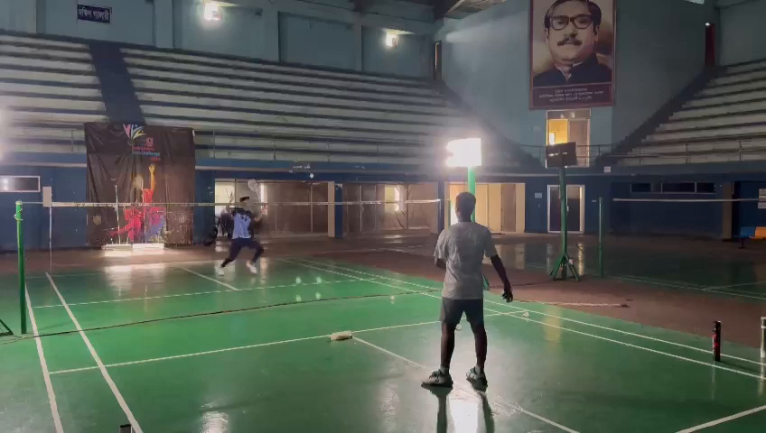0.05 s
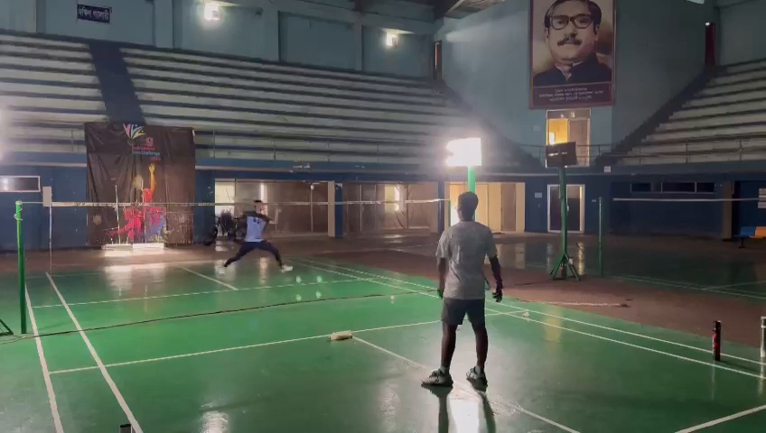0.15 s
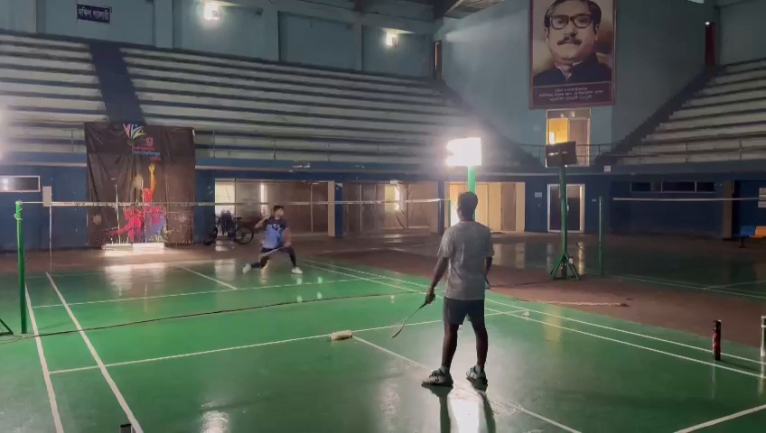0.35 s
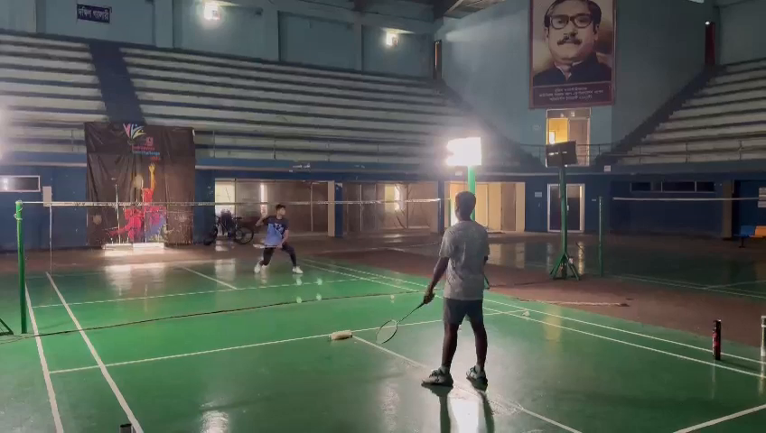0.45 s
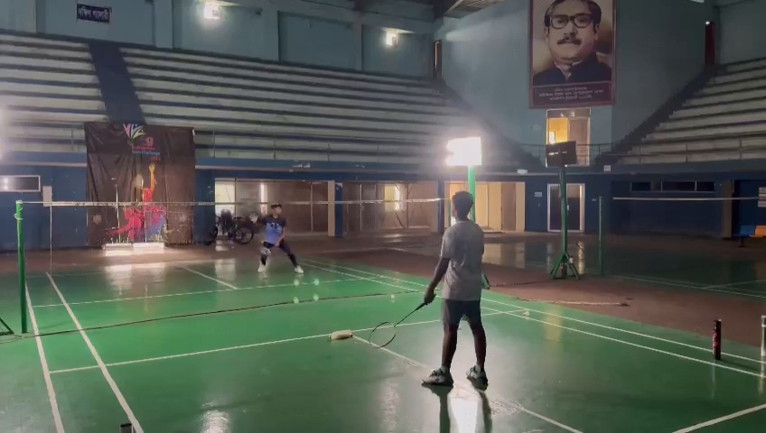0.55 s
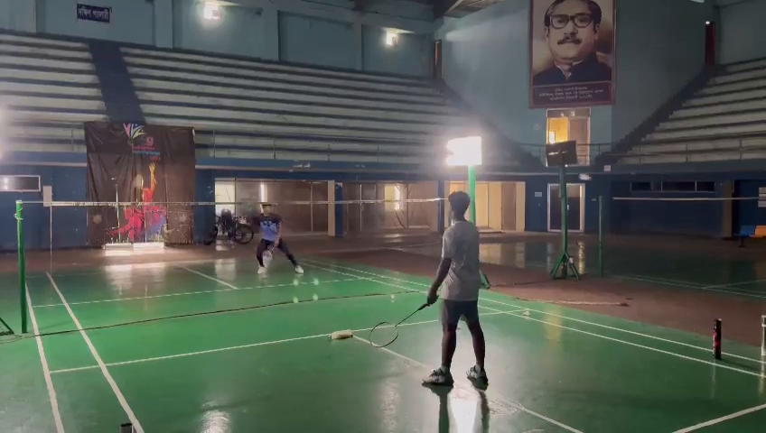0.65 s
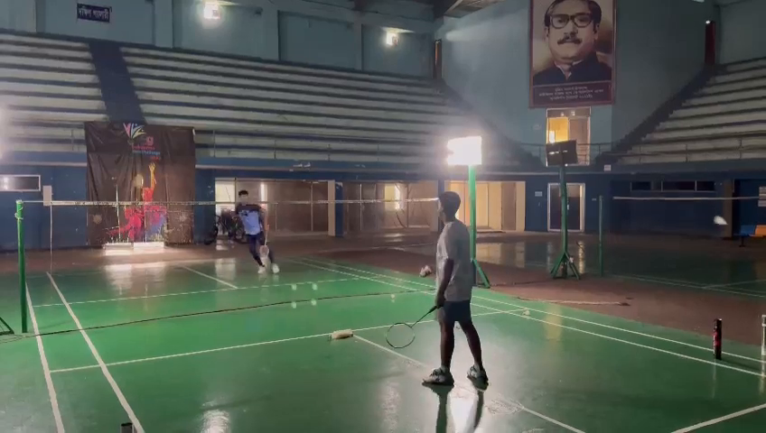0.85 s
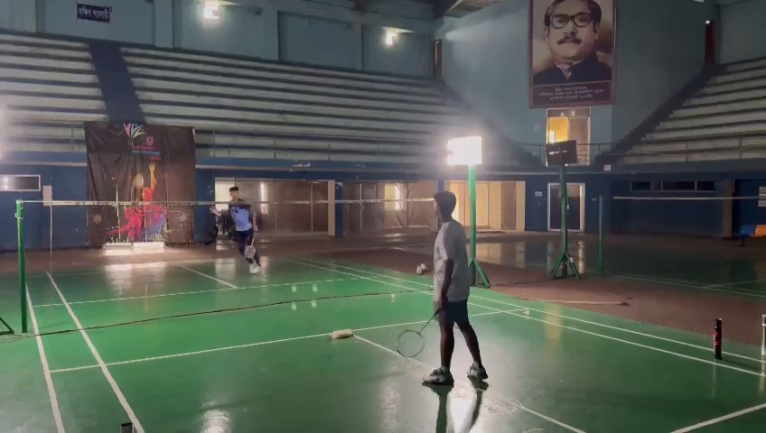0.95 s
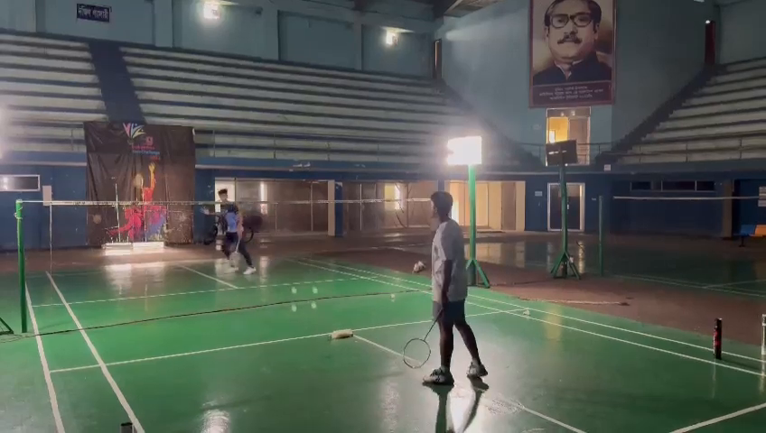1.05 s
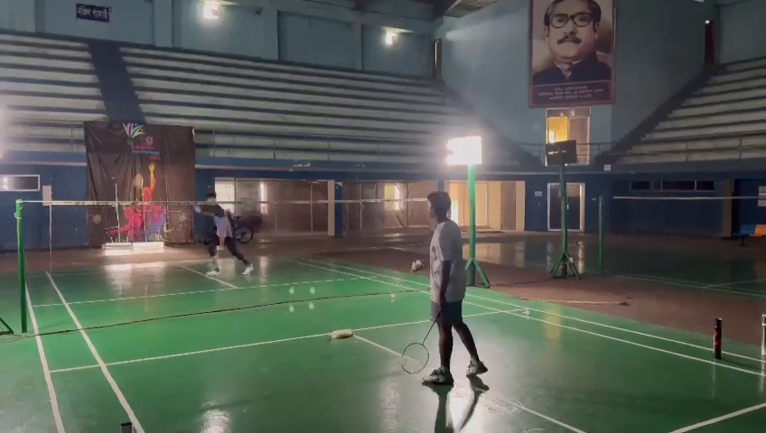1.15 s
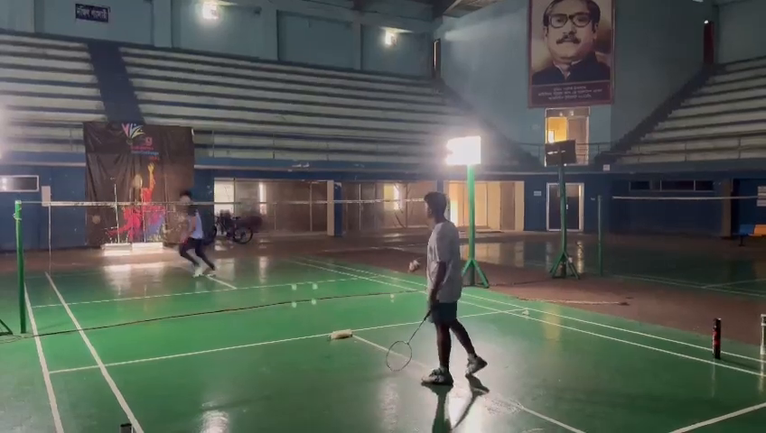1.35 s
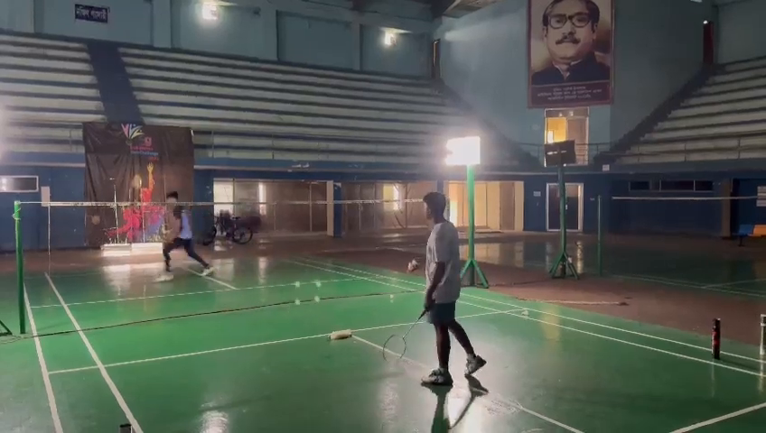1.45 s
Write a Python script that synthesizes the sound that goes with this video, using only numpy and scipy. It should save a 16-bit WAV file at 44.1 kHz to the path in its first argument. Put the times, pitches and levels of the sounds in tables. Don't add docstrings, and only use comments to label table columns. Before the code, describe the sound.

A racket smacks a shuttlecock with a bright, stringy crack; brief shoe squeaks and a foot stamp come just before, another squeak just after, then a long hall tail and faint steps, heard from near the court in stereo.

```python
import sys
import numpy as np
from scipy import signal
from scipy.fft import rfft, irfft, next_fast_len
from scipy.io import wavfile
from scipy.ndimage import uniform_filter1d

SR = 44100
rng = np.random.default_rng(int(sys.argv[2]) if len(sys.argv) > 2 else 0)


def to_wav(sig):
    pcm = np.clip(np.atleast_2d(sig), -1, 1) * 32767
    pcm = np.round(pcm).astype(np.int16)
    wavfile.write(sys.argv[1], SR, pcm.T)


def magnitude_from_level(level_db):
    exponent = np.asarray(level_db, float) / 20
    return 10 ** exponent


N = 66150
T = np.arange(N) / SR
HZ = np.arange(N // 2 + 1) * SR / N


def rms_one(x):
    return x / np.sqrt(np.mean(x ** 2) + 1e-20)


def at_hz(points, hz):
    p = np.array(points)
    return np.interp(np.log(hz), np.log(p[:, 0]), p[:, 1])


def convolve(a, b):
    size = next_fast_len(2 * N)
    return irfft(rfft(a, size) * rfft(b, size), size)[..., :N]


def pan(x, db):
    return x * magnitude_from_level(np.array([[db / 2], [-db / 2]]))


def after(s, t60, rise_s):
    t = np.maximum(T - s, 0)
    return (1 - np.exp(-t / max(rise_s, 1e-5))) * magnitude_from_level(-60 * t / t60)


def ring(s, hz, t60, contact_s):
    return after(s, t60, contact_s) * np.sin(2 * np.pi * hz * (T - s))


def coloured(spectrum):
    colour = magnitude_from_level(at_hz(spectrum, np.maximum(HZ, 20)))
    return rms_one(irfft(rfft(rng.standard_normal(N)) * colour, N))


def patches(knot_count, db):
    knots = np.linspace(0, N / SR, num=knot_count)
    return db * np.interp(T, knots, rng.standard_normal(knot_count))


# start in seconds, peak in dB, left over right in dB.
BLOW = (.3565, -12, 1.5)
# pitch in Hz, level in dB, t60 in seconds.
RACKET_MODES = [(190, -9, 0.05), (285, -6, 0.035), (680, -13, 0.014), (1560, -11, 0.018), (1920, -8, 0.014),
                (2750, -13, 0.012)]
# frequency in Hz, level in dB per Hz.
CRACK_COLOUR = [(900, -22), (2300, -1), (3400, -6), (4400, -4), (5500, -1), (6400, -9), (8500, 3),
                (12500, -13)]


def racket():
    s, db, _ = BLOW
    string_hz, string_t60_s, string_db, loaded_db = 1040, .085, -6.5, 1
    cork_load, cork_leaves_s, release_s = .22, .0031, .0005
    contact_s, frame_lag_s, frame_rise_s = 0.00015, .0025, .002
    crack_db, crack_t60_s, crack_rise_s, crack_early_s = 0, 0.010, 0.0006, .0006
    rustle_db, rustle_t60_s = -15.5, 0.064

    loaded = .5 - .5 * np.tanh((np.maximum(T - s, 0) - cork_leaves_s) / release_s)
    turns = string_hz * np.cumsum((T > s) * (1 - cork_load * loaded)) / SR
    size = magnitude_from_level(string_db) * (1 - loaded) + magnitude_from_level(loaded_db) * loaded
    twang = size * after(s, string_t60_s, contact_s) * np.sin(2 * np.pi * turns)

    knock = 0
    for hz, level_db, t60 in RACKET_MODES:
        if hz > string_hz / 2:
            mode = ring(s, hz, t60, contact_s)
        else:
            mode = ring(s + frame_lag_s, hz, t60, frame_rise_s)
        knock = knock + magnitude_from_level(level_db) * mode

    own = np.array([coloured(CRACK_COLOUR), coloured(CRACK_COLOUR)])
    feathers = coloured(CRACK_COLOUR) + .5 * own
    shape = after(s - crack_early_s, crack_t60_s, crack_rise_s)
    shape = shape + magnitude_from_level(rustle_db) * after(s, rustle_t60_s, crack_rise_s)
    return -magnitude_from_level(db) * (knock + twang), magnitude_from_level(db + crack_db) * feathers * shape


# start in seconds, length in seconds, level in dB,
# starting pitch in Hz, fall in Hz.
SQUEAKS = [
    (.0878, .007, -28.5, 4680, 160),
    (.120, .015, -31, 4610, 60),
    (.1315, .010, -33.5, 4480, 200),
    (.1345, .006, -43, 8650, 300),
    (.4145, .006, -39, 8800, 100),
    (.4215, .016, -28.5, 4760, 560),
]


def squeaks():
    overtone_db, rasp_db, slip_jitter, slip_skew = -22, -28, .02, .85
    wobble = rms_one(uniform_filter1d(rng.standard_normal(N), size=60))
    rasp = magnitude_from_level(rasp_db) * np.diff(coloured(CRACK_COLOUR), prepend=0)
    out = 0
    for s, length, db, hz, fall_hz in SQUEAKS:
        u = np.clip((T - s) / length, 0, 1)
        phase = 2 * np.pi * np.cumsum((hz - fall_hz * u) * (1 + slip_jitter * wobble)) / SR
        chirp = rasp + np.sin(phase) + magnitude_from_level(overtone_db) * np.sin(2 * phase)
        out = out + magnitude_from_level(db) * np.sin(np.pi * u ** slip_skew) ** 2 * chirp
    return out


# start in seconds, peak in dB, pitch in Hz, ring in cycles.
STEPS = [(.3040, -14.5, 660, 4.2), (.3044, -29, 1440, 18), (.3040, -33.5, 2020, 28),
         (.3096, -21.5, 469, 10.7), (.3105, -31.5, 935, 26), (.3105, -35, 1770, 17),
         (1.285, -28.5, 1363, 19.3), (1.2852, -25.5, 790, 8), (1.303, -38.5, 1390, 27),
         (1.3381, -24.5, 1080, 5.5), (1.3374, -29.5, 600, 6.2)]
# start in seconds, level in dB.
SCUFFS = [
    (1.2835, -59),
    (1.3367, -48.5),
    (1.35, -48.5),
]


def steps():
    knocks = sum(magnitude_from_level(db) * ring(s, hz, cycles / hz, .5 / hz) for s, db, hz, cycles in STEPS)
    scuff_shape = sum(magnitude_from_level(db) * after(s, 0.041, 0.00041) for s, db in SCUFFS)
    return pan(knocks + coloured(CRACK_COLOUR) * scuff_shape, 3.5)


# delay in seconds, level in dB, left over right in dB.
ECHOES = [
    (.0174, -9.5, 2),
    (.037, -19, -2),
]


def echoes(x):
    walls = 0
    for delay_s, db, pan_db in ECHOES:
        walls = walls + pan(np.interp(T - delay_s, T, x, left=0) * magnitude_from_level(db), pan_db)
    bass_cut_hz, top_hz = 1900, 7400
    return signal.sosfilt(signal.butter(6, [bass_cut_hz, top_hz], "band", fs=SR, output="sos"), walls)


# frequency in Hz,
# likeness (1 is identical, 0 unrelated).
LIKENESS = [(60, 1), (130, 0.98), (270, 0.88), (580, 0.48), (1240, 0), (2640, 0.06), (5620, -.1),
            (12000, -.2)]


def diffuse(gain_of_band):
    out, hz = 0, np.maximum(HZ, 1)
    mid, side = rfft(rng.standard_normal((2, N)))
    for centre in 25 * 2 ** np.arange(0, 9.3, 1 / 3):
        band = np.cos(np.pi / 2 * np.clip(3 * np.log2(hz / centre), -1, 1)) ** 2
        alike = np.clip(at_hz(LIKENESS, centre), -1, 1)
        m = np.sqrt(1 + alike) * mid * band
        s = np.sqrt(1 - alike) * side * band
        out = out + gain_of_band(centre) * irfft(np.array([m + s, m - s]), N)
    return out


# frequency in Hz, t60 in seconds.
HALL_T60 = [(60, 2.6), (250, 3.9), (700, 3.19), (1500, 2.26), (3000, 2.98), (5000, 2.19), (8000, 1.92),
            (12000, 0.18)]
# frequency in Hz, level in dB.
HALL_COLOUR = [(60, 5), (130, 1), (350, 9), (600, 8), (900, 4.5), (1400, 13.5), (4000, 3.5), (12000, 3.5)]


def hall(x):
    build_s, start_s = .03, .002
    far_walls_s, far_walls_db, far_walls_t60_s, far_walls_rise_s = .047, 11, .06, .008
    dull_hz, thin_hz = 2500, 330
    swell = magnitude_from_level(far_walls_db) * after(far_walls_s, far_walls_t60_s, far_walls_rise_s)

    def band_gain(hz):
        far_walls = swell / (1 + (hz / dull_hz) ** 2) / (1 + (thin_hz / hz) ** 2)
        level = magnitude_from_level(at_hz(HALL_COLOUR, hz) + patches(30, 1.8))
        return (1 + far_walls) * level * after(start_s, at_hz(HALL_T60, hz), build_s)

    tail = diffuse(band_gain)
    return convolve(x, tail / np.sqrt(np.sum(tail ** 2) / 2))


# frequency in Hz, level in dB per Hz.
AIR = [(40, 0.5), (80, 6.5), (250, -1.5), (600, -3), (1100, -9.5), (2000, -13.5), (5000, -19),
       (12000, -25.5)]
# frequency in Hz, fading in dB per second.
AIR_FADE = [(100, -0.5), (1000, -3.5), (6000, 5.5)]


def air():
    def band_gain(hz):
        return magnitude_from_level(at_hz(AIR, hz) - at_hz(AIR_FADE, hz) * T + patches(16, 1.8))

    return magnitude_from_level(-45.5) * rms_one(diffuse(band_gain))


def scene():
    (knock, crack), squeak, step = racket(), squeaks(), steps()
    blow_s, _, blow_pan_db = BLOW
    blow = knock + crack
    step_mono = step.mean(axis=0)

    lag_s = .00006
    late = irfft(rfft(blow[1]) * np.exp(-2j * np.pi * HZ * lag_s), N)
    direct = np.array([blow[0], late]) * pan(0.95, blow_pan_db) + pan(squeak, 3.5) + step

    impulse = 1. * (np.arange(N) == int(blow_s * SR))
    thump = signal.sosfilt(signal.cheby1(8, 1, 1045, fs=SR, output="sos"), impulse)
    click = magnitude_from_level(3.5) * impulse + magnitude_from_level(16) * thump
    send = magnitude_from_level(-20.5) * knock + click + magnitude_from_level(-0.5) * squeak + magnitude_from_level(-5.5) * step_mono
    return direct + echoes(blow[0] + squeak + step_mono) + hall(send) + air()


def band_limit(x):
    return signal.sosfilt(signal.butter(12, 12570, fs=SR, output="sos"), x)


# low edge in Hz, high edge in Hz, list of sounding spans (from,
# to) in seconds.
TOP_BANDS = [(9150, 10250, [(.06, .135), (.29, .337), (.35, .388), (.423, .46)]),
             (10250, 11400, [(-1, .135), (.265, .424), (.44, 2)]), (11400, 11750, [(0, .135), (.34, .41),
             (.44, .66), (.72, .8), (1.17, 1.25), (1.3, 1.45)]), (11750, 12500, [(.352, .364)])]
# low edge in Hz, high edge in Hz, from and to in seconds.
DROPOUTS = [
    (3550, 3900, .1, .15),
    (5150, 5550, .19, .235),
    (6950, 7450, .283, .31),
    (3100, 3500, .645, .692),
]


def record(dry):
    limit, bass_cut_hz = .45, 46
    rounded = limit * np.tanh(dry / limit)
    x = signal.sosfilt(signal.butter(4, bass_cut_hz, "high", fs=SR, output="sos"), rounded)
    spectrum = rfft(x)

    def band(low, high):
        return irfft(spectrum * (HZ >= low) * (HZ < high), N)

    def gate(spans):
        return uniform_filter1d(sum((T > a) * (T < b) for a, b in spans) * 1., size=300)

    out = band(0, TOP_BANDS[0][0])
    for low, high, spans in TOP_BANDS:
        out = out + gate(spans) * band(low, high)
    for low, high, a, b in DROPOUTS:
        out = out - gate([(a, b)]) * band(low, high)
    return band_limit(out)


dry = scene()
out = record(dry)
to_wav(out)
```